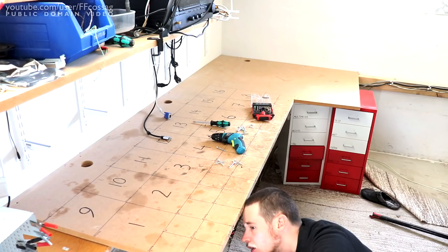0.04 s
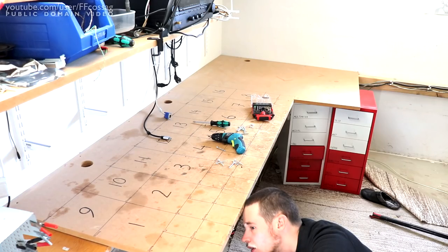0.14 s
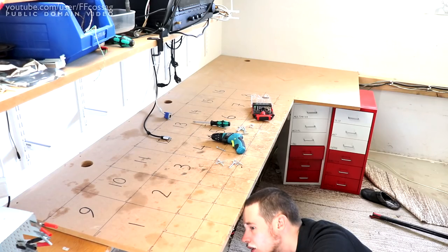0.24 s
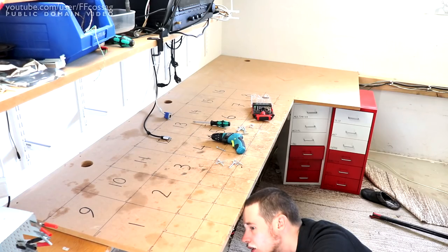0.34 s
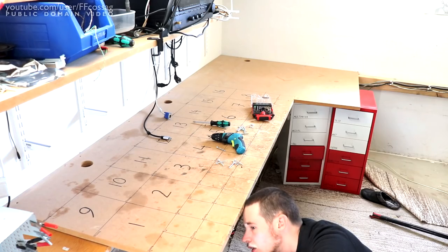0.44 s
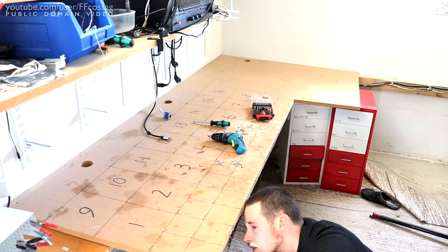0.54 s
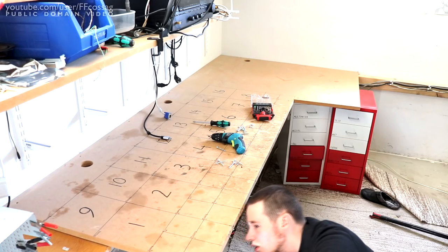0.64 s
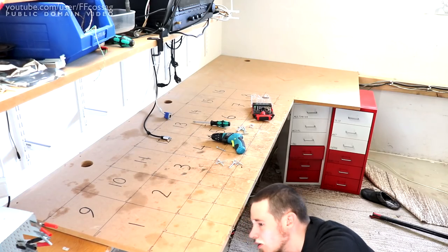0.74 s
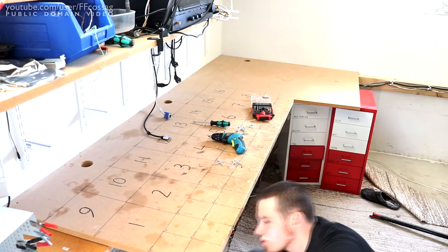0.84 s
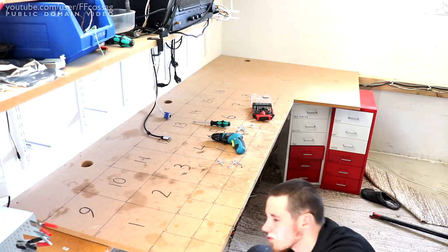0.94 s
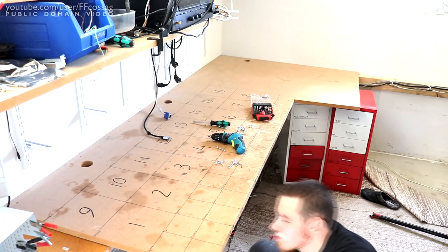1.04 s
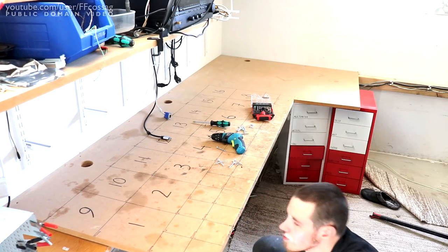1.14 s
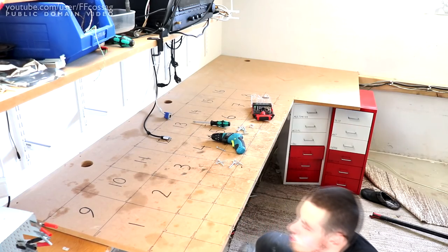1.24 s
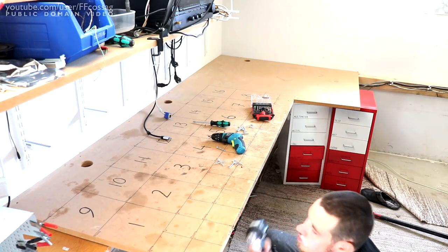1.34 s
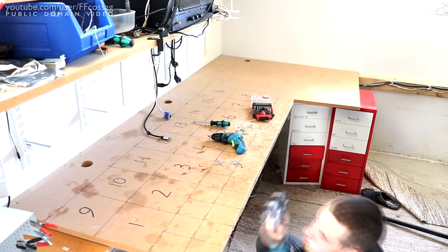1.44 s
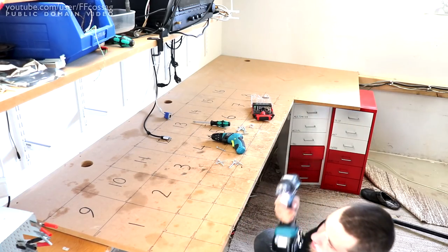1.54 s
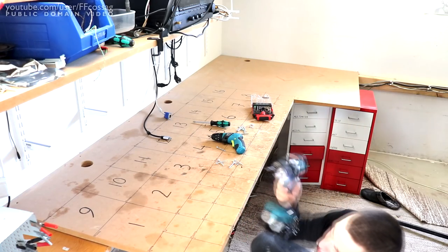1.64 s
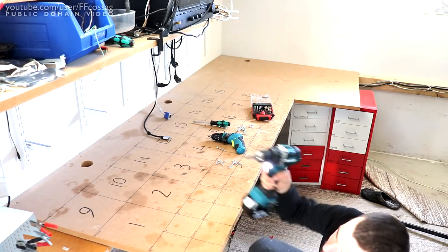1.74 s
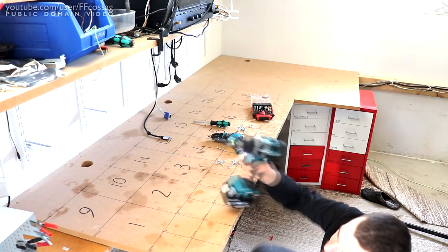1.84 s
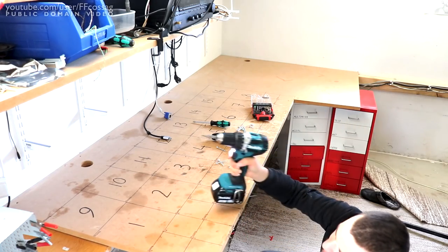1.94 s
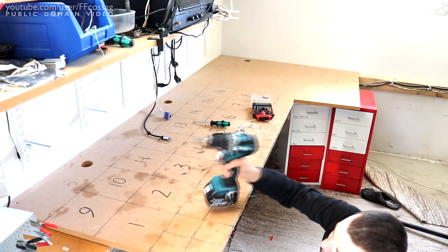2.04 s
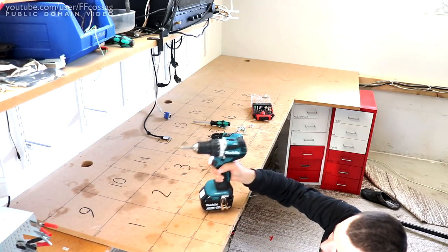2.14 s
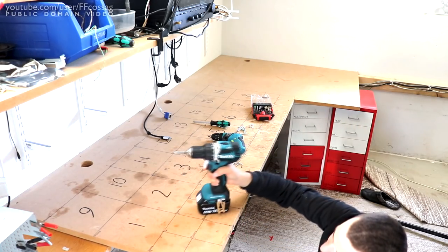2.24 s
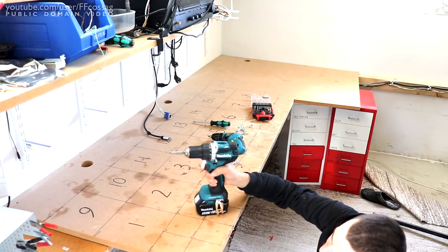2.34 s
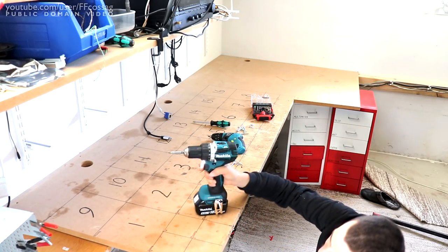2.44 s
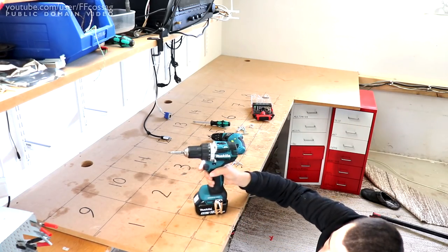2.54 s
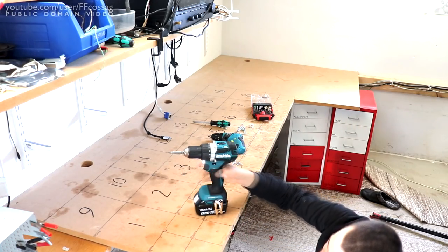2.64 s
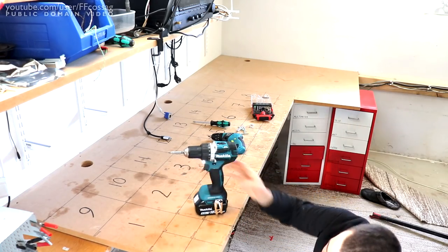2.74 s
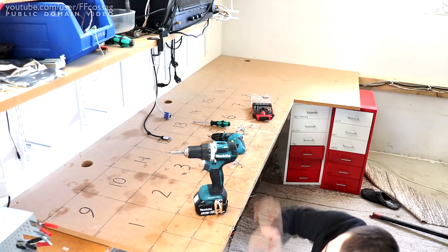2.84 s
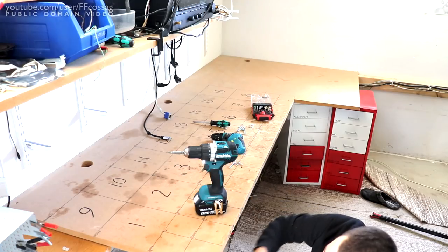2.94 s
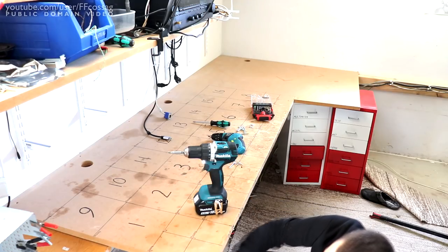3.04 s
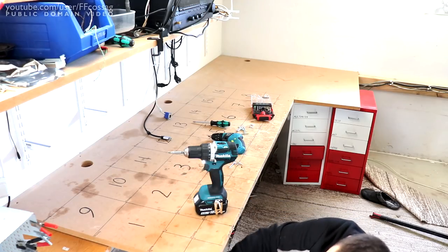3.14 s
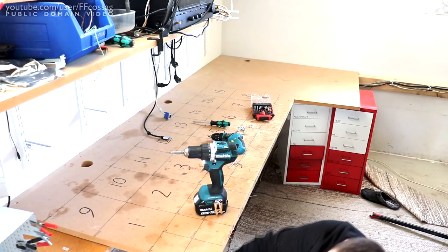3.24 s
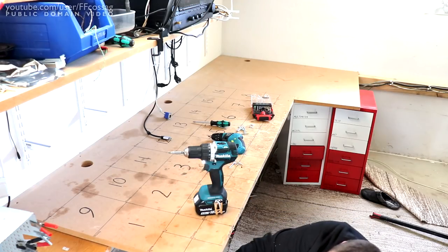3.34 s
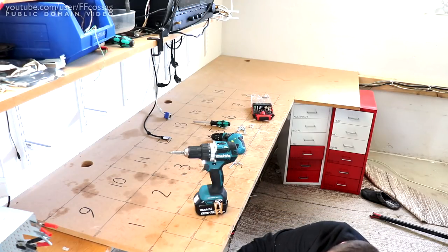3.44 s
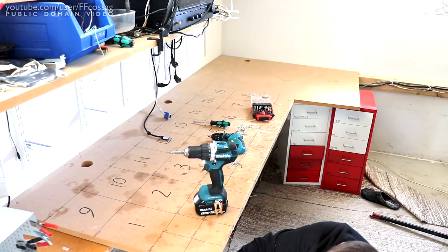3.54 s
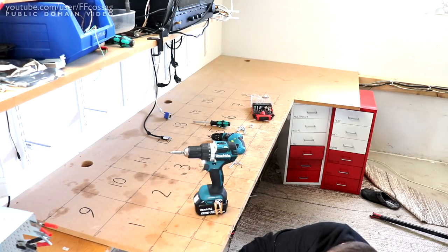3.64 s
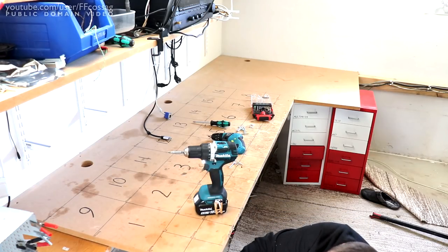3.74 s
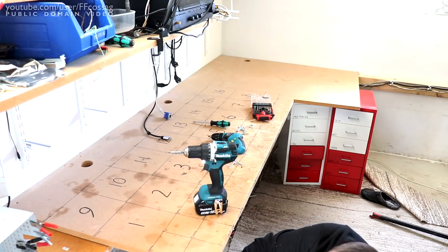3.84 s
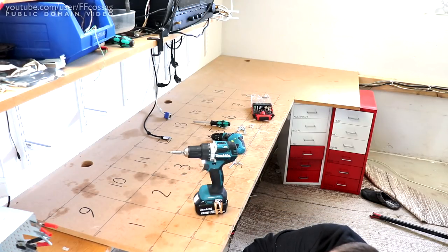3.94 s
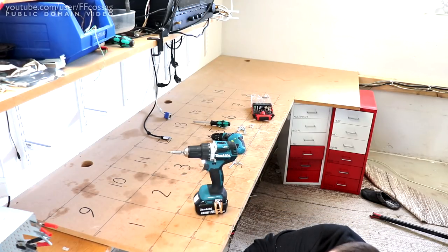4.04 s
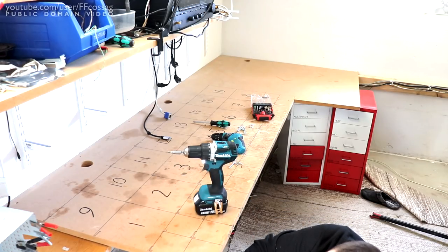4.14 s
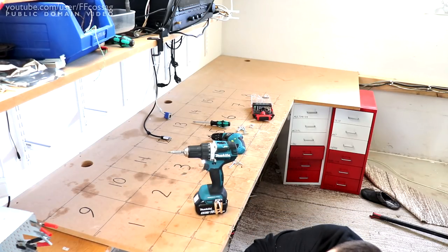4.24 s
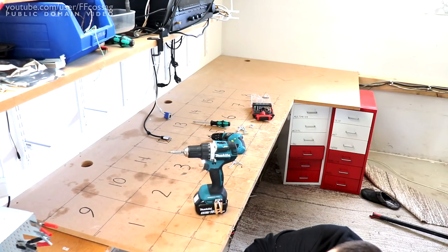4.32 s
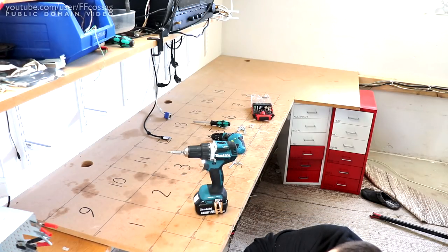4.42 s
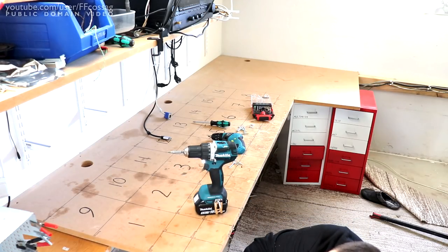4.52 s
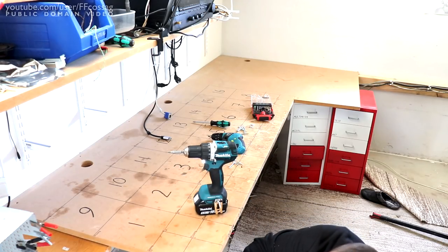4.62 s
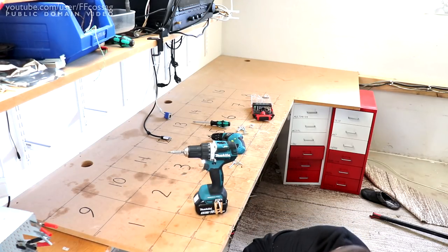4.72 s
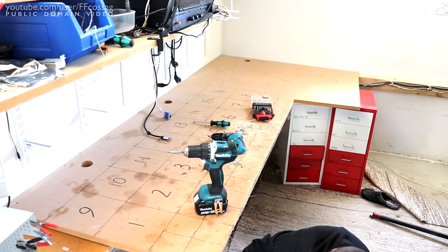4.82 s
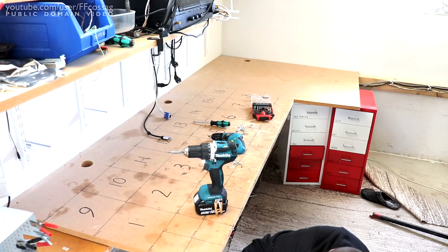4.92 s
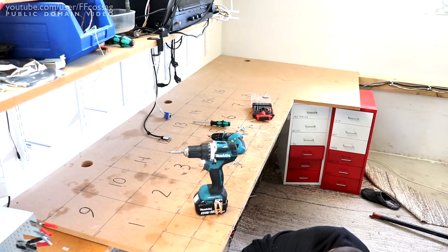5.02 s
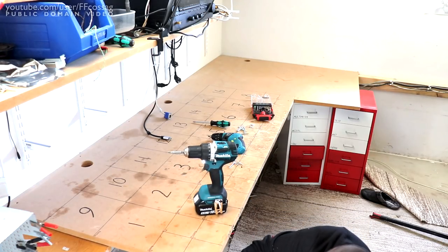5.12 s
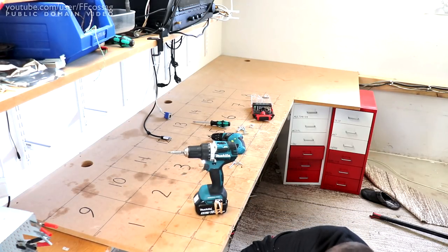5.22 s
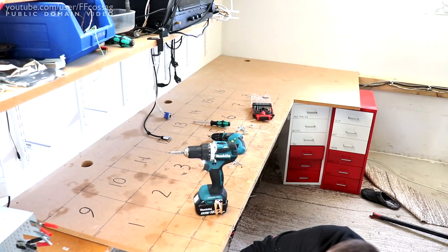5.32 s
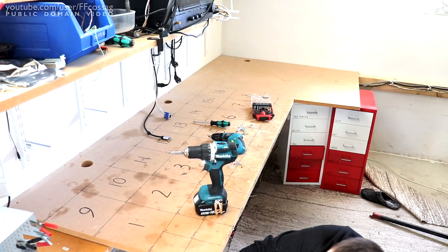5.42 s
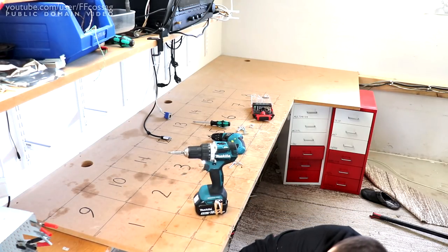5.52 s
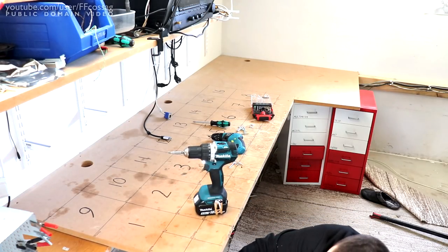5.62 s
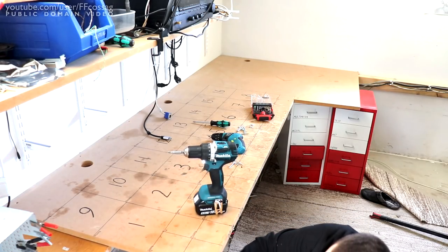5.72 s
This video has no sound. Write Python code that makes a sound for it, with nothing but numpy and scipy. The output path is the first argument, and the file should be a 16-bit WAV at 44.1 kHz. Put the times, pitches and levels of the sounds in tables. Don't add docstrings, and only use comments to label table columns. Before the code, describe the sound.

A cordless drill is already whirring at the start, gritty and bright, its pitch sagging until it brakes with a crisp, jarring clack around 0.3 s. A faint jingle and soft floor thuds follow. From 0.84 to about 1.2 s the plastic body scuffs and knocks across floorboards, then lifts away; a light sleeve swish passes near 1.6 s. At 2.33 s the drill is set down hard on a wooden bench: a loud cracking thunk with quick rocking contacts and a deep, hollow boom fading over the next second. Tiny clicks come at 2.6-2.7 s, then a metal jingle near 2.9 s. From 3.3 s a case and loose hardware rattle in repeated shakes, with a heavier floor thud at 3.76 s, a hard rap near 5.2 s and bright clinks around 5.3-5.7 s. The room is small and hard-walled, with steady microphone hiss.

```python
import sys
import numpy as np
from scipy import signal
from scipy.fft import rfft, irfft
from scipy.io import wavfile
from scipy.ndimage import uniform_filter1d

SR = 44100
rng = np.random.default_rng(int(sys.argv[2]) if len(sys.argv) > 2 else 0)


def to_wav(s):
    ch = np.atleast_2d(s).T
    pcm = np.round(np.clip(ch, -1, 1) * 32767)
    wavfile.write(sys.argv[1], SR, pcm.astype(np.int16))


def volts_from_db(level):
    exponent = np.asarray(level, float) / 20
    return 10 ** exponent


N = 254587

# frequency in Hz, level in dB per Hz.
HISS_SPECTRUM = [(18, -76), (45, -2.5), (85, -4), (204, -6.5), (295, -6), (632, -10.5), (684, -9.5),
                 (760, -10.5), (913, -12), (5040, -19), (16000, -28)]
HISS_DB = -60.5
# frequency in Hz, t60 in seconds.
ROOM_T60 = [(200, 0.78), (530, 0.45), (1390, 0.3), (3680, 0.34), (9700, 0.24)]

BOARD_HZ = (60.2, 84.3)
# frequency in Hz, width in Hz, level in dB.
BOX_MODES = [(143.4, 24.5, 8), (163, 5.6, 7.5), (174.3, 6, 8.5), (215, 6.3, -9)]
# start in seconds, upper mode in dB, then lower mode, boxy thud
# and dull knock, all in dB relative to the upper mode.
THUDS = [(0, -44.5, 3, 0, -8), (.15, -42, -2, -23, -28), (0.301, -53.5, 2.5, -1, 5.5),
         (0.682, -49, 4, 4, -13), (0.842, -59.5, -5, 13.5, 12.5), (.91, -62.5, -1, 14, 19.5),
         (0.985, -54, -3, 2, 12.5), (1.07, -78, 6, 4, 15), (1.17, -76.5, 5, 15, 0), (2.76, -74, 0, 18, 6),
         (3.31, -49.5, 0.5, 5, -2.5), (3.759, -33, -5.5, -5.5, -22.5), (3.94, -48.5, 4.5, -15, -33),
         (4.128, -49, -1, -3, -8.5), (4.33, -52, -10, -5, -0.5), (4.409, -53.5, -7, -2, -10),
         (4.578, -63, -5, 10.5, 8), (4.68, -75, -7, 13.5, 3), (4.873, -62.5, -16, 0, 3.5),
         (5.03, -57, -6, 7, 5.5), (5.177, -49.5, -2, 2.5, -3), (5.235, -47.5, -5, -1.5, -12),
         (5.42, -48.5, -11, -8.5, -10.5), (5.54, -53.5, 0, -9, -4.5), (5.719, -48, -5, -15, -13)]
THUD_RISE_S = (0.022, 0.036, 0.022, 0.0011)
THUD_T60_S = (1, 0.87, 0.61, 0.38)
STILL_S = 0.055

# time in seconds, dull level in dB, bright level in dB re dull.
SCUFF = [
    (0.82, -94, -15),
    (0.844, -37.5, -8),
    (0.95, -43.5, -11),
    (1.104, -57.5, -5.5),
    (1.28, -61, -6),
    (1.3, -71, 9),
]
# time in seconds, level in dB, centre in Hz.
SWING = [
    (1.42, -67, 1520),
    (1.564, -58, 1240),
    (1.64, -52, 2220),
    (1.706, -59, 2480),
    (1.76, -99, 2100),
]

# start in seconds, peak in dB, centre in Hz, t60 in seconds, width
BRAKE_KNOCKS = [
    (0, -29.5, 346, 0.25, 0.23),
    (0.086, -34.5, 283, 0.41, 0.062),
    (0.309, -16, 2660, 0.06, 0.56),
    (0.312, -14.5, 4040, 0.059, 0.53),
    (0.3338, -17, 6170, 0.064, 0.68),
    (.334, -45, 11650, 0.035, .6),
    (0.337, -19.5, 1060, 0.055, 0.46),
]
# start in seconds, peak in dB, centre in Hz, t60 in seconds, width share.
PICKUP_KNOCKS = [(0.8384, -35, 2500, 0.047, 1.3), (0.847, -26, 2250, 0.097, 1.6),
                 (0.874, -29.5, 635, 0.078, 0.43), (0.911, -22.5, 800, 0.039, 1.6),
                 (0.939, -29, 624, 0.085, 0.26), (.962, -28.5, 1500, 0.16, 0.97),
                 (0.965, -37, 2520, 0.15, 0.31), (0.852, -29, 2450, 0.04, 0.15),
                 (0.859, -36, 1150, 0.046, 0.42), (.972, -25, 610, 0.051, 0.43),
                 (0.986, -39, 3030, 0.061, 0.11), (0.991, -29.5, 1020, 0.083, 0.49),
                 (1.008, -33.5, 557, 0.029, 1), (1.137, -41, 373, 0.044, 0.24),
                 (1.238, -39, 413, 0.037, 0.19), (1.539, -41, 1105, 0.19, 0.2),
                 (1.6404, -38, 2320, 0.25, 1)]
# start in seconds, peak in dB, centre in Hz, t60 in seconds, width share.
TICKS = [(2.624, -48, 13000, .03, 0.42), (2.618, -45, 1400, .05, 0.6), (2.649, -47, 2800, 0.043, 0.4),
         (2.672, -45, 2400, .08, 0.46), (2.675, -44, 9000, 0.027, 1), (2.70, -44, 8000, 0.045, 1),
         (2.711, -48, 8900, .12, 1), (2.9967, -42, 4730, 0.036, 0.91), (3.014, -36, 5300, 0.025, 0.83),
         (3.2927, -32.5, 2300, 0.089, 0.56), (3.3186, -34, 1900, 0.14, 0.5)]
# start in seconds, peak in dB, centre in Hz, t60 in seconds, width share.
CASE_KNOCKS = [
    (2.79, -43.5, 2260, 0.07, 0.67),
    (3.284, -44.5, 418, 0.2, 0.14),
    (5.03, -46, 432, 1, 0.09),
    (5.187, -28.5, 1360, 0.18, 0.051),
    (5.204, -35, 300, 0.26, 0.51),
]

# frequency in Hz, width in Hz, level in dB.
BITS = [(1480, 68, -5.5), (2176, 130, -3), (2780, 85, -3), (3080, 74, -9), (3410, 27, -12), (3910, 32, -8),
        (4500, 150, -30), (4620, 140, -15), (6400, 49, -11), (8000, 39, -15), (8290, 66, -21),
        (8750, 38, -21), (11200, 63, -21), (11300, 44, -15)]
LATCH = [(1240, 11, 3), (1330, 26, -2), (1446, 30, -3), (2020, 31, 1), (2240, 50, -12), (2560, 130, -16),
         (2980, 29, -25), (3620, 83, -24), (3880, 27, -18), (4320, 40, -7), (4730, 36, -10), (5130, 54, -7)]
HINGE = [(1240, 27, 6), (1654, 61, -6), (1850, 55, -14), (3570, 90, -21), (4310, 54, 4), (4420, 54, -3),
         (4730, 34, -12), (5060, 41, -16), (5980, 25, 0)]
TRAY = [(1265, 18.5, -7), (1500, 36, 0), (2037, 41, 0), (2660, 71, -2.5), (3360, 23, -25), (3800, 25, -26),
        (3800, 31, -28), (4480, 22, -13), (4700, 81, -22), (4840, 62, -16), (5990, 22, -10)]
STRAP = [(1250, 290, 3), (1500, 110, -4), (2040, 220, -4), (2450, 110, 7), (3500, 260, -15),
         (4200, 180, -12)]
LID = [(1500, 36, -10), (1990, 65, -6.5), (2400, 26, -2), (2670, 110, 2.5), (3370, 32, -27),
       (3800, 50, -15), (3980, 50, -4), (4410, 180, -8), (5100, 37, -9), (5370, 35, -24), (5980, 65, -15)]
SCREWS = [(2260, 78, -7.5), (2520, 82, -10), (3160, 72, -23), (3520, 65, -12), (3580, 27, -22),
          (3870, 140, -13), (4100, 78, -15), (4250, 36, -11), (4540, 48, -6), (5960, 67, -2.5),
          (6400, 25, -8)]
# frequency in Hz, width in Hz, level in dB.
PINS = [(6330, 33, -27), (6670, 35, -23), (7650, 32, -29), (8070, 40, -19), (9000, 35, -9), (9900, 51, -21),
        (10060, 49, -9), (10800, 40, -8), (11560, 45, -15), (13300, 45, -22), (14600, 60, -29)]
WASHERS = [(7740, 34, -3), (8070, 86, -17), (8300, 120, -14), (8430, 120, -4), (8870, 63, -3),
           (9700, 51, 4), (10000, 41, -8), (10720, 130, 6), (11600, 100, -5), (12600, 36, -13),
           (13300, 41, -7), (14600, 79, -12), (14800, 42, -20)]
# peak time in seconds, ring at 2.5 kHz in dB, build-up in seconds,
# die-away in seconds, low ring in dB re that at 2.5 kHz.
SHAKES = [
    [(.58, -63, 0.059, 0.08, 1.5), (.70, -59, 0.073, 0.079, 1), (2.70, -62.5, 0.14, 0.43, -13),
     (2.80, -60.5, 0.094, 0.095, 2.5), (2.91, -51, 0.056, 0.11, -1.5)],
    [(3.315, -45.5, 0.048, 0.14, -1), (3.42, -54, 0.064, 0.032, -19)],
    [(3.70, -49, 0.077, 0.2, -5.5)],
    [(3.78, -49, 0.076, 0.19, -2), (3.83, -49, 0.1, 0.096, -0.5), (4.09, -49.5, 0.07, 0.17, -4),
     (4.14, -54, 0.078, 0.058, 6), (4.22, -81, 0.064, 0.29, -8), (4.36, -48.5, 0.12, 0.086, 2),
     (4.57, -51.5, 0.11, 0.091, 1.5)],
    [(4.89, -57, 0.043, 0.31, 1)],
    [(5.06, -49, 0.096, 0.33, 1.5), (5.20, -41, 0.21, 0.13, -4.5)],
    [(5.26, -52, 0.068, 0.52, -7), (5.40, -50, 0.16, 0.1, -9.5), (5.48, -41, 0.19, 0.14, -13),
     (5.77, -48, 0.14, 0.09, -6)],
]
# high ring in dB, top ring in dB.
BRIGHT_DB = [
    (-7, -14),
    (-4, -12.5),
    (-4, -13.5),
    (-7, -15),
    (-8, -18),
    (-7.5, -19.5),
    (-3.5, -9),
]
SCRAPES_DB = [1, 0, 1, 1, 5, 0, -1]
# time in seconds, level in dB over the rattle.
CLINKS = [(2.896, 12.5), (3.399, 16), (4.874, -1), (5.031, -5), (5.189, -18.5), (5.259, 15), (5.424, 13),
          (5.4613, 21.5), (5.482, -2), (5.49, 20.5), (5.508, -5), (5.52, -4), (5.62, 6), (5.712, 6),
          (5.734, 8)]
# lower edge in Hz, upper edge in Hz.
RING_EDGES = [
    (1900, 3200),
    (800, 1850),
    (3200, 7000),
    (7000, 15500),
]
SCRAPE_SHARES = (.62, .9, 1.1, 1.1)
SHAKE_RANGE_DB = 30
FLICKER_DB = 4.5
STRIKE_SCRAPE = .25
SPREAD = .0045

# time in seconds, gear noise in dB, gear mesh in Hz, mesh tone in dB.
MOTOR = [
    (0, -29, 600, -69),
    (.1, -32.5, 607.6, -66),
    (.16, -32, 564.6, -61),
    (.24, -32.5, 530, -64),
    (.3, -34, 500.4, -71),
    (.33, -40.5, 463, -56),
    (.36, -33.5, 444, -75),
]
# multiple of the mesh frequency, level in dB.
MESH = [
    (2, 0),
    (3, 3),
    (4.1, 2),
]
# frequency in Hz, gain in dB.
MESH_COLOUR = [(900, 0), (1700, 1), (1980, -12), (2190, 6), (2330, -6), (2500, -12)]
MESH_DB = 13
# frequency in Hz, level in dB per Hz.
GEARS = [(71, -21), (120, -5), (278, -13.5), (308, -23), (341, -7.5), (500, -13.5), (874, -20),
         (1090, -10.5), (2020, -6.5), (2200, -5.5), (2930, -13), (5190, 3), (13300, -27.5), (16000, -44)]
# frequency in Hz, width in Hz, level in dB.
HOUSING = [(2720, 110, -2.5), (3020, 120, -1), (3420, 430, 1.5), (1366, 42, -2), (4700, 40, -8),
           (4900, 170, 1.5), (5460, 100, 3), (5940, 83, 0), (6170, 73, -12), (6400, 130, 3.5),
           (6880, 51, 4), (7560, 100, -4), (8600, 45, -2), (8950, 27, -5)]
# first in Hz, last in Hz, width in Hz, level in dB.
WHINE = (15384, 15510, 30, -60)

# time in seconds, level in dB, treble in dB per octave.
BLOWS = [(2.332, 0, 4.5), (2.344, -4, 3), (2.346, -11, -2), (2.357, -7, -7), (2.362, -5, -5),
         (2.367, -2, -6.5), (2.375, -8.5, -0.5), (2.387, -18, -2), (2.393, -16.5, 3.5), (2.411, -8.5, -3.5),
         (2.416, -10, -1.8), (2.423, -10, -4), (2.44, -14, -11), (2.453, -18, -7.5), (2.475, -25, -1),
         (2.557, -36, -6)]
# frequency in Hz, level in dB,
# t60 in seconds, rise in seconds.
BENCH_MODES = [(50, -25, 0.94, 0.0064), (68.5, -31, 0.22, 0.0059), (83.7, -3, 0.93, 0.15),
               (105.5, -14, 1, 0.12), (137, -7.5, 0.54, 0.03), (154, -30, .55, 0.034),
               (161.5, -7.5, 0.54, 0.026), (180, -17, 0.29, 0.013), (192.5, -11, 0.5, 0.025),
               (213, -18, 0.38, 0.015), (244.4, -12, 0.44, 0.06), (259.5, -13, 0.58, 0.079),
               (285, -18.5, 0.48, 0.016),
               (316, -28, 0.5, 0.02), (343, -21, 0.49, 0.012), (370, -21.5, 0.84, 0.022),
               (393, -18, 0.6, 0.018), (399, -26, 0.5, 0.022), (458, -24.5, 0.86, 0.0056),
               (478, -32, 0.54, 0.01), (524, -21, 0.53, 0.011), (550, -30, 0.35, 0.01),
               (612, -22, 0.36, 0.0085), (674, -38, 0.37, 0.0067), (1280, -24, 0.34, .002)]
BEAT_HZ = (61.2, 65.4)
BEAT = (-16.5, 1.22, 0.17)
# frequency in Hz, level in dB, t60 in seconds, swell constant in seconds
APRON = (172, -16, 0.4346, -1.5)
# frequency in Hz, level in dB per Hz.
CRACK = [(150, -29), (250, -8.5), (530, -1.5), (660, -9), (800, -8), (1400, -6), (1820, -12), (2020, -11.5),
         (2710, -14.5), (2960, -20.5), (9490, -35), (16000, -56)]
# frequency in Hz, level in dB per Hz.
TAIL = [(120, -4), (200, -10.5), (260, -8.5), (400, -7.5), (520, -7), (660, -9.5), (806, -10),
        (1480, -13.5), (1870, -15.5), (2250, -14), (2420, -21.5), (3560, -28), (16000, -46)]
CRACK_DB, BENCH_TAIL_DB = -24, -31.5
THUMP_DB, THUMP_S = -12.5, 0.00031
CRACK_RISE_S = .0008
SPLIT = .035
GRIP_DB_PER_S2 = 138


def evened(x):
    return x / np.sqrt(np.mean(x ** 2) + 1e-20)


def read(points, hz):
    f, value = np.transpose(points)
    return np.interp(np.log(hz + 1), np.log(f + 1), value)


def curves(rows):
    s, *columns = np.transpose(rows)
    t = np.arange(s[0], s[-1], 1 / SR)
    return t, [np.interp(t, s, c) for c in columns]


def add(mix, s, sound):
    part = mix[round(s * SR):][:len(sound)]
    part += sound[:len(part)]


def coloured(x, points):
    gain = volts_from_db(read(points, np.fft.rfftfreq(len(x), 1 / SR)))
    return evened(irfft(rfft(x) * gain, len(x)))


def band(x, lo, hi):
    sos = signal.butter(3, [lo, min(hi, SR * .45)], "bandpass", fs=SR, output="sos")
    return evened(signal.sosfilt(sos, x))


def resonate(x, hz, width):
    r = np.exp(-np.pi * width / SR)
    if np.ndim(hz) == 0:
        return 2 * signal.lfilter([1 - r], [1, -r * np.exp(2j * np.pi * hz / SR)], x).real
    turn = np.exp(2j * np.pi * np.cumsum(hz) / SR)
    return 2 * (turn * signal.lfilter([1 - r], [1, -r], x / turn)).real


def steep(x, hz, width):
    return resonate(resonate(x, hz, width), hz, width)


def body(x, peaks, flicker_db=0., hold=0.091):
    size = int(hold * SR)
    turns = rng.standard_normal((len(peaks), len(x)))
    turns = evened(uniform_filter1d(uniform_filter1d(turns, size), size))
    total = 0
    for (hz, width, db), turn in zip(peaks, turns):
        gain = volts_from_db(db + flicker_db * np.tanh(turn))
        total = total + gain * steep(x, hz, 2.93 * width + SPREAD * hz)
    return evened(total)


def ring(t, hz, db, t60, rise):
    return volts_from_db(db - 60 * t / t60) * (1 - np.exp(-t / rise)) * np.sin(2 * np.pi * hz * t)


def grit(count, per_s, spread_db):
    sizes = volts_from_db(spread_db * np.minimum(rng.exponential(1, count), 4)) * rng.standard_normal(count)
    return evened(sizes * (rng.random(count) < per_s / SR))


def hiss():
    return volts_from_db(HISS_DB) * coloured(rng.standard_normal(N), HISS_SPECTRUM)


def room(x, stretch=1.):
    taps = np.zeros(SR)
    at = np.arange(120, SR - 20, 20) + rng.integers(0, 20, (SR - 121) // 20)
    taps[at] = rng.choice([-1., 1.], len(at))
    hz, t, z = signal.stft(taps, SR, nperseg=256)
    decay = volts_from_db(-60 * t / (stretch * read(ROOM_T60, hz))[:, None])
    tail = signal.istft(z * decay, SR, nperseg=256)[1]
    return signal.fftconvolve(x, tail / np.linalg.norm(tail))[:len(x)]


def boards():
    t = np.arange(SR * 2 // 3) / SR
    power = np.zeros((4, N))
    ends = [row[0] for row in THUDS[1:]] + [N / SR]
    for (s, db, *others_db), until in zip(THUDS, ends):
        stilled = np.clip((until - s - t) / STILL_S + 1, 0, 1)
        for layer, rel_db, rise, t60 in zip(power, [0] + others_db, THUD_RISE_S, THUD_T60_S):
            onset = np.minimum((t + (s == 0)) / rise, 1)
            add(layer, s, (stilled * volts_from_db(db + rel_db - 60 * t / t60) * onset) ** 2)
    upper, lower, box, dull = np.sqrt(power)
    drift = 1 + 0.0253 * evened(uniform_filter1d(rng.standard_normal(N), size=4000))
    phase = 2 * np.pi * np.cumsum(drift) / SR
    modes = sum(volts_from_db(4.0) * size * np.sin(hz * phase) for hz, size in zip(BOARD_HZ, (lower, upper)))
    shake = rng.standard_normal(N)
    return modes + box * body(shake, BOX_MODES) + dull * band(shake, 191, 656)


def swing():
    t, (db, hz) = curves(SWING)
    cloth = grit(len(t), per_s=9000, spread_db=3)
    swish = evened(steep(cloth, hz, 1.5 * hz.mean()))
    return t[0], volts_from_db(db) * evened(swish + 0.27 * band(cloth, 1100, 8400))


def scuff():
    t, (db, bright_db) = curves(SCUFF)
    rub = grit(len(t), per_s=5700, spread_db=-0.5)
    return t[0], volts_from_db(db - 7.5) * (band(rub, 220, 1730) + volts_from_db(bright_db) * band(rub, 2500, 9900))


def knock(s, db, hz, t60, share):
    t = np.arange(SR // 5) / SR
    shape = volts_from_db(-60 * t / t60) * np.minimum(t / 0.0018, 1)
    burst = rng.standard_normal(len(t)) * np.sqrt(shape)
    burst = steep(burst, hz, np.clip(share, .05, 3) * hz) * np.sqrt(shape)
    return s, volts_from_db(db - 11.0) * burst * np.linalg.norm(shape) / np.linalg.norm(burst)


def fittings():
    washers = [(hz, width, db + 1.5) for hz, width, db in WASHERS]
    return [BITS] + [parts + PINS for parts in (LATCH, HINGE, TRAY, STRAP, LID)] + [SCREWS + washers]


def rattle(peak, top_db, rise, fall, low_db, parts, bright_db, scrape_db):
    t = peak - rise + np.arange(np.ceil((rise + fall) * 10) * SR // 10) / SR
    db = top_db - SHAKE_RANGE_DB * np.maximum((peak - t) / rise, (t - peak) / fall)
    db = uniform_filter1d(db, size=SR // 40)
    strikes = sum(volts_from_db(over - 60 * np.maximum(t - s, 0) / 0.056) * np.clip((t - s) / 0.0013, 0, 1)
                  for s, over in CLINKS)
    contacts = grit(len(t), per_s=5000, spread_db=1.0)
    blows = strikes * rng.standard_normal(len(t))
    rings = body(contacts + blows, parts, flicker_db=FLICKER_DB, hold=0.014)
    scrape = coloured(contacts + STRIKE_SCRAPE * blows,
                      [(700, -5.0), (1500, 5.0), (5000, -3.5), (11000, -15.5), (12500, -21), (15500, -28)])
    mix = 0
    for rel_db, edges, share in zip([0, low_db, *bright_db], RING_EDGES, SCRAPE_SHARES):
        both = band(rings, *edges) + share * volts_from_db(scrape_db) * band(scrape, *edges)
        mix = mix + volts_from_db(rel_db) * evened(both)
    return t[0], volts_from_db(db + 1.0) * mix * signal.windows.tukey(len(t), .08)


def motor():
    t, (gear_db, hz, tone_db) = curves(MOTOR)
    turns = np.cumsum(hz) / SR
    teeth = grit(len(t), per_s=11000, spread_db=1.0)
    throb = volts_from_db(0.8 * np.sin(2 * np.pi * turns / 12))
    gears = evened(coloured(teeth, GEARS) + 0.43 * body(teeth, HOUSING, flicker_db=8, hold=0.018))
    mesh = sum(volts_from_db(db + read(MESH_COLOUR, k * hz)) * np.sin(2 * np.pi * k * turns) for k, db in MESH)
    first_hz, last_hz, width, whine_db = WHINE
    whine = volts_from_db(whine_db) * evened(steep(teeth, np.linspace(first_hz, last_hz, len(t)), width))
    whine = whine * np.clip((.31 - t) / 0.023, 0, 1)
    return gears * throb * volts_from_db(gear_db) + mesh * volts_from_db(tone_db + MESH_DB) + whine


def bench_boom(t):
    boom = ring(t, BEAT_HZ[0], *BEAT) - ring(t, BEAT_HZ[1], *BEAT) - ring(t, *APRON)
    modes = BENCH_MODES
    low_unity = np.minimum(np.array(modes)[:, :1] / 300, 1) ** 1.38
    twins = SPLIT * rng.uniform(-1.0, 1, (len(modes), 2)) * low_unity
    top = 0
    for (hz, *rest), (a, b) in zip(modes, twins):
        beating = 0.38 + 0.56 * np.cos(2 * np.pi * hz * a * t)
        top = top + ring(t, hz, *rest) * beating - 0.54 * ring(t, hz * (1 + b), *rest)
    return boom + volts_from_db(-GRIP_DB_PER_S2 * t ** 2) * top


def bench():
    t = np.arange(SR * 3 // 2) / SR
    first_s = BLOWS[0][0]
    cracks, pushes = np.zeros(len(t)), np.zeros(len(t))
    for s, db, treble_db in BLOWS:
        colour = [(hz, v + treble_db * np.log2(1 + hz / 2500)) for hz, v in CRACK]
        shape = volts_from_db(db - 60 * t[:2000] / 0.031) * np.minimum(t[:2000] / CRACK_RISE_S, 1)
        add(cracks, s - first_s, shape * coloured(rng.standard_normal(2000), colour))
        add(pushes, s - first_s, np.atleast_1d(volts_from_db(db + 1.32 * treble_db)))
    u = t[:600] / THUMP_S
    thump = signal.oaconvolve(pushes, u * (2 - u) * np.exp(-u))[:len(t)]
    cracks /= np.linalg.norm(cracks) / np.sqrt(SR / 10)
    tail = coloured(room(pushes, stretch=0.79), TAIL) * np.minimum(t / 0.0048, 1)
    boom = bench_boom(t) - volts_from_db(THUMP_DB) * thump
    return first_s, boom + volts_from_db(CRACK_DB) * cracks + volts_from_db(BENCH_TAIL_DB) * tail


def scene():
    near, low = np.zeros(N), boards()
    echo = room(np.eye(1, SR)[0], stretch=0.89)
    add(near, *swing())
    add(near, *scuff())
    for row in BRAKE_KNOCKS + PICKUP_KNOCKS + TICKS + CASE_KNOCKS:
        add(near, *knock(*row))
    for rows, *kind in zip(SHAKES, fittings(), BRIGHT_DB, SCRAPES_DB):
        for row in rows:
            add(near, *rattle(*row, *kind))
    add(near, 0, motor())
    add(low, *bench())
    reverberant = signal.fftconvolve(near, echo)[:N]
    return (volts_from_db(0.5) * near + volts_from_db(-5.5) * reverberant + low + hiss())[None]


def roll_off(x):
    return signal.sosfilt(signal.butter(12, 15740, fs=SR, output="sos"), x)


def record(dry):
    power_db = 10 * np.log10(abs(uniform_filter1d(dry[0] ** 2, size=300)) + 1e-12)
    fall = np.arange(N) * 60. / SR
    over_db = np.maximum(np.maximum.accumulate(power_db + fall) - fall + 20.5, 0)
    squeeze_db = .45 * uniform_filter1d(over_db, size=100)
    held = 0.54 * np.tanh(dry / volts_from_db(squeeze_db) / 0.55)
    low_pass = signal.firwin(255, 16500, window=("kaiser", 8), fs=SR)
    limited = signal.oaconvolve(held, low_pass[None], "same")
    rumble_cut = signal.butter(3, 42, "highpass", fs=SR, output="sos")
    return roll_off(signal.sosfilt(rumble_cut, limited))


dry = scene()
out = record(dry)
to_wav(out)
```